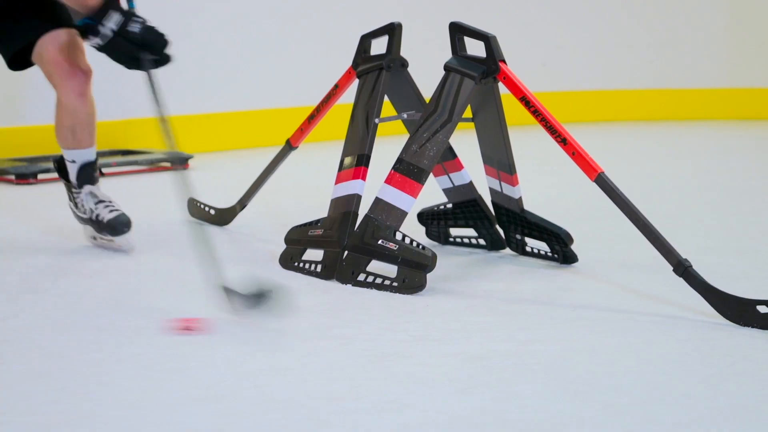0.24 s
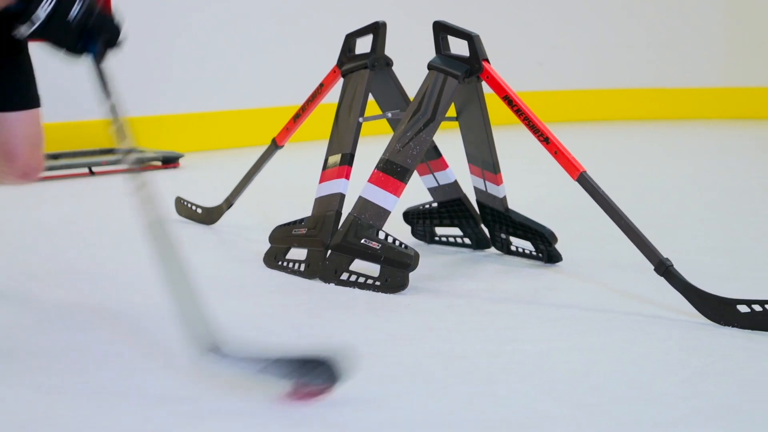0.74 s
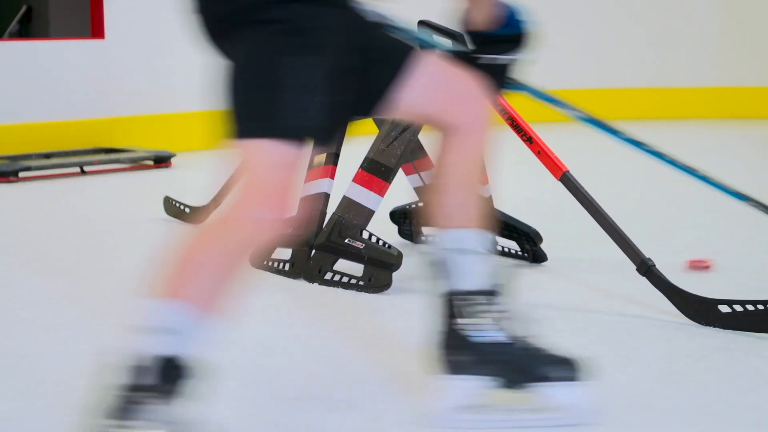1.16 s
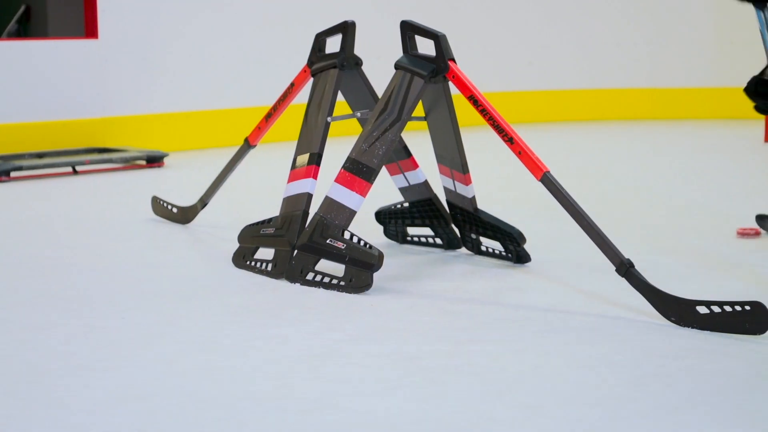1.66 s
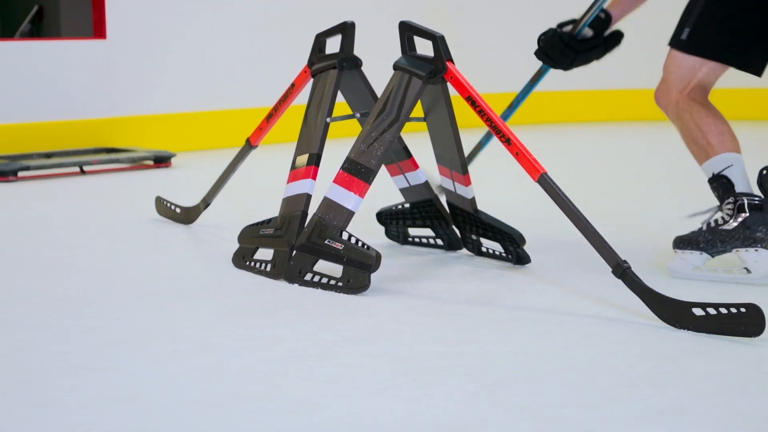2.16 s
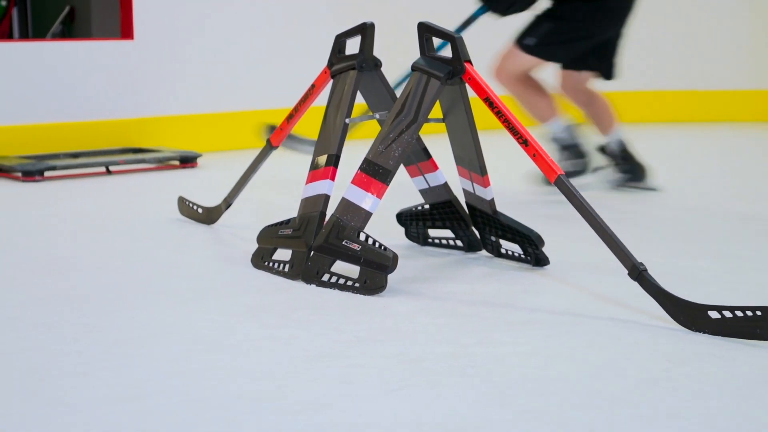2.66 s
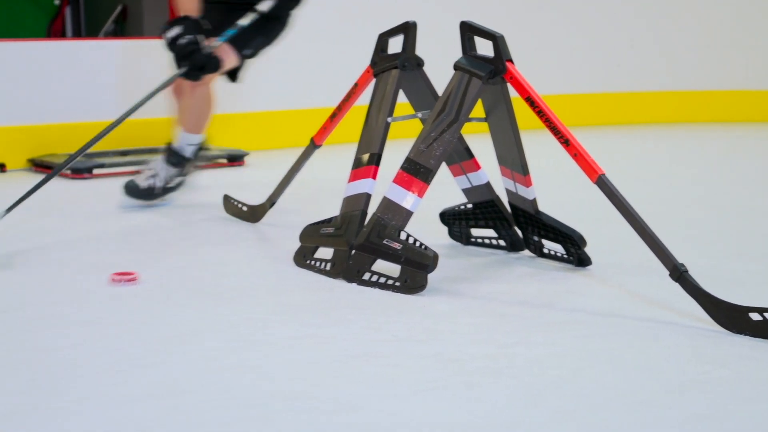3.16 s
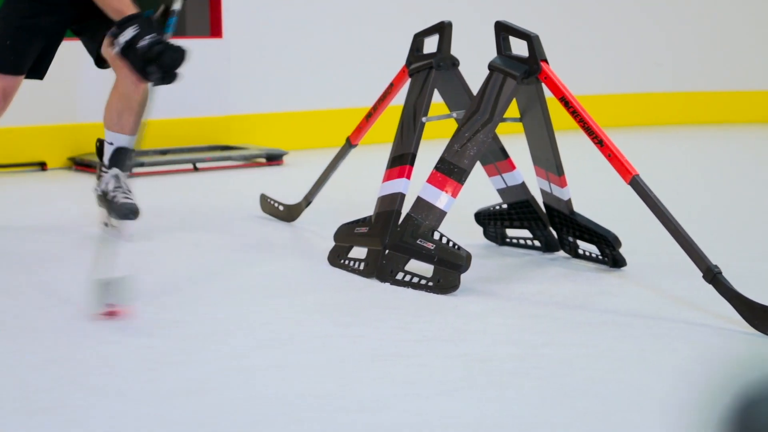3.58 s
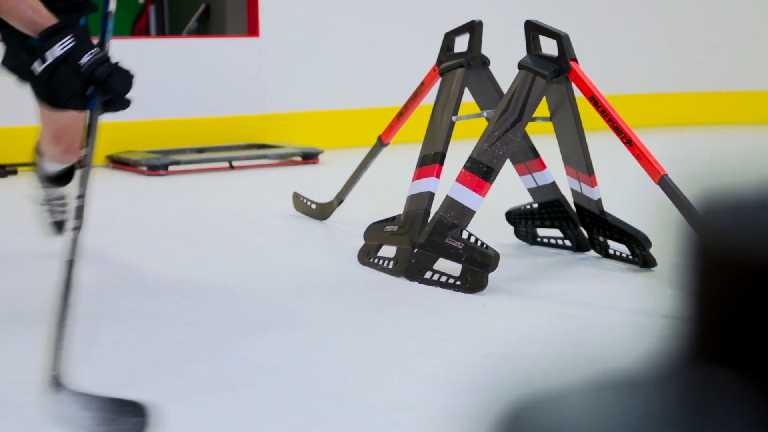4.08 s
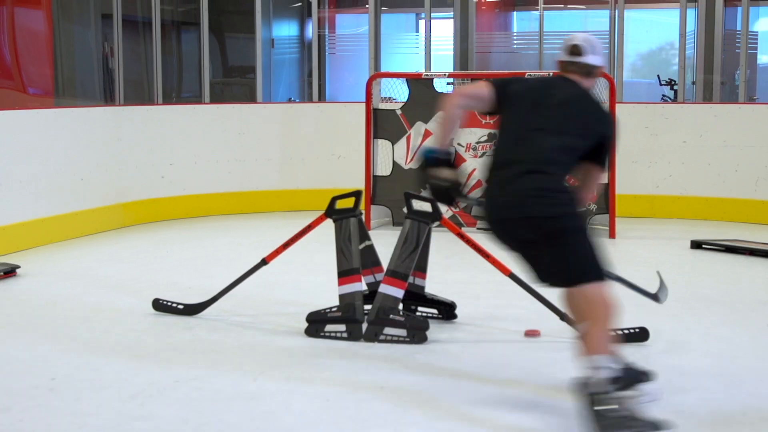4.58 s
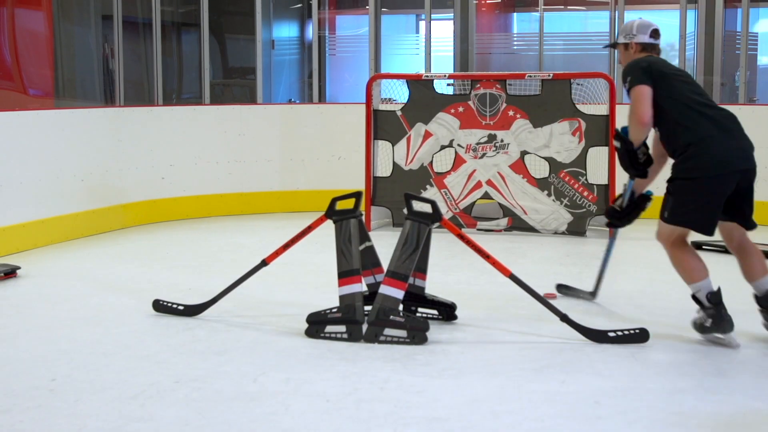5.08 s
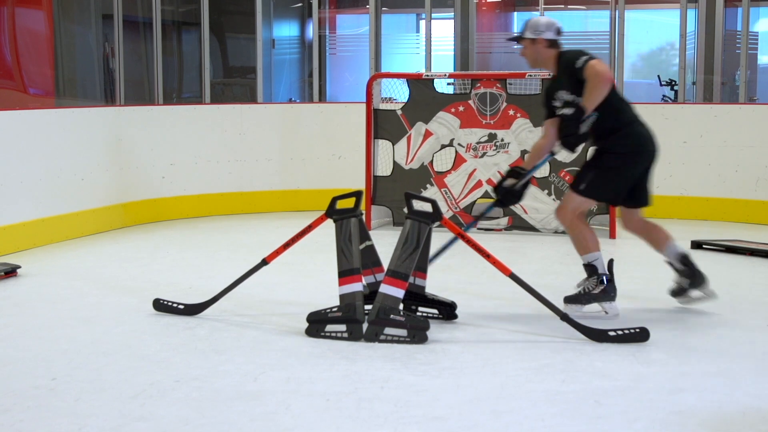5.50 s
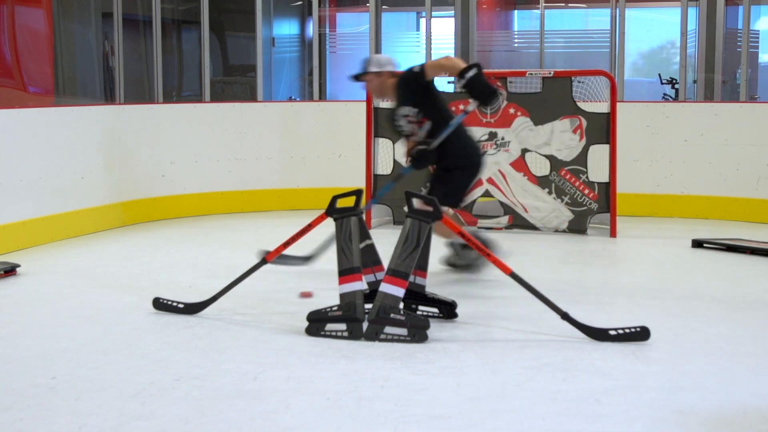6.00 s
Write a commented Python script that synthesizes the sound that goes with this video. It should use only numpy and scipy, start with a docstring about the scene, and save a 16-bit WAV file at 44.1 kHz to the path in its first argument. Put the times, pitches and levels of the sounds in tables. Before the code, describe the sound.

Sharp knocks and woody thuds of stickhandling, quick puck rattles, and skates carving synthetic ice over steady ventilation rush in a lively indoor hall.

```python
"""A small indoor rink with plastic ice tiles, where a hockey player dribbles a puck before one microphone.
Skates drum, rush, grind and scrape on the hollow floor: shaped noises whose levels follow each move.
Stick blows mix tile thud, blade ring, crack and edge chatter; puck and runners add short noise taps.
Boards, glass and ceiling echo the blows and taps; the hall's ventilation rushes steadily behind."""
import sys
import numpy as np
from scipy import signal
from scipy.fft import rfft, irfft, next_fast_len
from scipy.io import wavfile
from scipy.ndimage import uniform_filter1d, map_coordinates

SR = 44100
rng = np.random.default_rng(int(sys.argv[2]) if len(sys.argv) > 2 else 0)


def master(y):
    """Save y as 16-bit WAV."""
    cut = np.clip(np.atleast_2d(y).T, -1, 1)
    pcm = np.round(cut * 32767)  # scale
    wavfile.write(sys.argv[1], SR, pcm.astype(np.int16))


N = 275625

# blows of the stick: (time [s], strength [dB], hardness [0 flat on the tile to 1 square on the puck],
# free ring [dB], bending mode [Hz], twisting mode [Hz])
BLOWS = [(0.0218, -14.5, .39, -7, 1010, 2160), (0.1284, -5.5, 0.75, 1, 973, 2610),
         (0.3657, -10, 0.61, 4, 817, 2550), (0.398, -8.5, 0.8, 1.5, 1140, 1920),
         (0.586, -17, .17, 0.5, 910, 1680), (0.6681, -5.5, 0.536, -5.5, 890, 1890),
         (0.7021, -6.5, 0.75, -2, 1185, 2300), (0.899, -18.5, 0.29, 2.5, 780, 1720),
         (1.0377, -16, 0.19, 3, 780, 1850), (1.385, -11.5, 0.53, -3.5, 786, 3350),
         (1.407, -20.5, .85, 5.5, 926, 1600), (1.785, -20.5, 0.044, 3.5, 690, 3100),
         (1.8595, -11, 0.83, 7, 917, 1620), (2.098, -14.5, 0.84, 10, 1105, 2580),
         (2.141, -11.5, 1, 0, 750, 2740), (2.373, -5.5, 0.63, -7.5, 1360, 3200),
         (2.386, -10.5, 0.4, 6, 1110, 2270), (2.4152, -11.5, 0.91, 5, 1298, 1960),
         (2.829, -12, 0.056, -0.5, 865, 1730), (3.4151, -17, 0.4, -3, 980, 1810),
         (3.6127, -8.5, 0.74, 3, 980, 2480), (3.8074, -8, 0.55, 6, 774, 2460),
         (3.848, -9.5, 0.86, -0.5, 1405, 2490), (4.0401, -17, 0.028, -6, 740, 3330),
         (4.0954, -2, 0.51, -2, 1100, 2050), (4.1491, -11.5, 0.74, 2, 724, 1670),
         (4.514, -12, 0.16, 3.5, 846, 2010), (4.857, -23.5, 0.38, -0.5, 875, 1560),
         (5.021, -24.5, 0.24, 4.5, 715, 3560), (5.2425, -10, 0.57, 4, 950, 2070),
         (5.5015, -10, 0.32, 6, 1094, 2180), (5.5379, -12, 0.99, 3.5, 907, 1660),
         (5.7821, -4.5, .74, -3.5, 820, 1910), (5.8225, -14.5, 0.86, 4, 1320, 1910),
         (6.235, -11, 0.094, 3, 755, 1780)]
# bright chatter of hard edges: (frequency [Hz], relative density [dB])
EDGE_SPECTRUM = [(2500, -19), (4400, 3), (5600, -0.5), (7200, -1.5), (8300, 0), (9600, -5.5), (11000, -5),
                 (12300, -2), (14000, -11), (16000, -13)]
# short tap on a tile: (frequency [Hz], relative density [dB])
TAP_SPECTRUM = [(300, 14), (900, 9), (2300, 6), (3700, 0), (5000, -6), (8000, -48), (16000, -39)]
TICK_DB = -18  # bright tick of a puck landing or stray runner, against the tap's strength


def amp(db):
    """Decibels to gain."""
    return 10 ** (np.asarray(db) / 20)


def unit(x):
    """Scaled to rms 1."""
    return x / np.sqrt(np.mean(x ** 2) + 1e-20)


def unit_onset(x):
    """Scaled to rms 1 over its first hundredth of a second."""
    return x / np.sqrt(np.mean(x[:SR // 100] ** 2) + 1e-20)


def along(points, hz):
    """Values between (Hz, value) points on a log frequency axis."""
    f, v = np.transpose(points)
    return np.interp(np.log(hz + 1), np.log(f + 1), v)


def wobble(rate, size=N):
    """A smooth random curve with rate knots a second."""
    knots = rng.standard_normal(int(size * rate / SR) + 4)
    return map_coordinates(knots, [np.arange(size) * rate / SR])


def filtered(x, response):
    """x times a response of frequency."""
    m = next_fast_len(len(x) + 4096)
    return irfft(rfft(x, m) * response(np.fft.rfftfreq(m, 1 / SR)), m)[:len(x)]


def coloured(x, spectrum):
    """x shaped by the spectrum, falling steeply past both its ends, at rms 1."""
    low, high = spectrum[0][0], spectrum[-1][0]

    def response(hz):
        skirts = np.minimum(hz / low, 1) ** 2 * np.minimum(high / (hz + 1), 1) ** 4
        return amp(along(spectrum, hz)) * skirts

    return unit(filtered(x, response))


def noise(spectrum, size):
    """Noise of rms 1 with the given spectrum."""
    return coloured(rng.standard_normal(size), spectrum)


def slips(rate, size):
    """Tiny random impacts, on average rate a second, at rms 1."""
    return unit(rng.standard_normal(size) * (rng.random(size) < rate / SR))


def held(rows, attack_s, release_s):
    """Gain that rises, holds and falls for each (start s, end s, dB) row."""
    t = np.arange(N) / SR
    gain = np.zeros(N)
    for start, end, db in rows:
        gain += amp(db) * np.interp(t, [start, start + attack_s, end, end + release_s], [0, 1, 1, 0])
    return gain


def contact(t, rise, hold, t60):
    """Envelope of a blow: it builds, lasts while the surfaces chatter, then dies."""
    return (1 - np.exp(-t / rise)) * amp(-60 * np.maximum(t - hold, 0) / t60)


def add(track, s, sound):
    """Mix a sound into the track at time s."""
    i = max(round(s * SR), 0)
    track[i:i + len(sound)] += sound[:max(N - i, 0)]


def hall():
    """Steady rush of the ventilation, as unchanging shaped noise."""
    # rush of the hall: (frequency [Hz], relative density [dB])
    rush = [(25, -45), (70, -30), (160, -9.5), (240, -7), (373, 1.5), (600, -6), (900, -9), (1500, -22.5),
            (2150, -21.5), (2800, -36), (5700, -35.5), (11000, -37.5), (12200, -36), (13200, -39.5),
            (15500, -46)]
    return amp(-39) * noise(rush, N)


def skates():
    """Runners drum on the hollow floor, glide, grind when leaned on and tear fine grains off the plastic."""
    # the skates under way: (time [s], glide level [dB], edge level [dB], hiss level [dB])
    skating = [(0.0, -35, -42, -53), (0.19, -30, -42, -51), (0.66, -34.5, -38, -52.5),
               (1.09, -34, -54, -49.5), (1.81, -36.5, -44, -53), (2.02, -31.5, -38.5, -48.5),
               (2.42, -36, -39, -53), (2.91, -39.5, -46.5, -54.5), (3.38, -35.5, -72, -57.5),
               (3.62, -32.5, -43, -49), (4.12, -33, -37.5, -58), (4.37, -32.5, -43.5, -55),
               (4.67, -37, -51.5, -54), (5.15, -32, -48, -54.5), (5.4, -33, -39.5, -51),
               (5.97, -30.5, -37.5, -51), (6.09, -32.5, -45, -53), (6.25, -37, -51, -48)]
    # strides that load the hollow floor: (start [s], end [s], rumble level [dB])
    strides = [(0.26, 0.62, -41), (1.18, 1.36, -39.5), (1.48, 1.82, -45), (2.12, 2.38, -37),
               (3.29, 3.56, -52), (3.72, 4.04, -49), (5.52, 5.64, -37), (5.66, 5.77, -32)]
    # carves, an edge leaned hard into the turn: (start [s], end [s], grind level [dB], hiss level [dB])
    carves = [(0.0, 0.12, -29, -50), (0.74, 0.843, -35, -48.5), (1.008, 1.28, -39, -59),
              (1.382, 1.55, -28.5, -64), (4.275, 4.337, -32, -46), (5.265, 5.322, -29, -50),
              (5.99, 6.07, -28, -44.5)]
    # spectra of the floor, the glide, the leaned runner, shaved plastic and the scraping edge:
    # (frequency [Hz], relative density [dB])
    rumble_spectrum = [(20, -30), (45, -5), (70, 1), (108, 2.5), (140, -4), (200, -4.5), (350, -51)]
    glide_spectrum = [(100, -46), (220, -16.5), (310, -1.5), (390, 2), (500, -4), (650, -9), (1100, -30)]
    grind_spectrum = [(350, 7), (560, 4.5), (720, 0), (950, -4), (1300, -11.5), (1800, -26), (3000, -20)]
    hiss_spectrum = [(3000, 4.5), (6000, -1), (9000, -0.5), (12300, -1.5), (15500, -7)]
    scrape_spectrum = [(700, -29), (1400, 23.5), (2500, 16.5), (3100, 4.5), (3800, 14.5), (4900, 0.5),
                       (6300, -10), (8300, -29.5), (10300, -38.5), (12300, -2), (15500, -40)]
    load_s, unload_s = 0.02, 0.076  # weight comes on and off
    rolling_db, glide_offset_db, grind_db = -21.5, -2.5, -8  # each against the glide level
    hiss_offset_db, scrape_offset_db = -3.5, -7  # against the hiss and edge levels

    s, *columns = np.transpose(skating)
    glide_db, edge_db, hiss_db = [np.interp(np.arange(N) / SR, s, c) for c in columns]
    # an unloaded runner still rumbles faintly under its glide
    weight = held(strides, load_s, unload_s) + amp(glide_db + rolling_db)
    lean = held([(start, end, db) for start, end, db, _ in carves], load_s, unload_s)
    shave = held([(start, end, db) for start, end, _, db in carves], load_s, unload_s)

    rumble = weight * amp(0.67 * wobble(25)) * noise(rumble_spectrum, N)
    glide_flicker_db = 1.7 * wobble(35) + 0.5 * wobble(9.8)
    glide = amp(glide_db + glide_offset_db + glide_flicker_db) * noise(glide_spectrum, N)
    grind_gain = np.hypot(lean, amp(glide_db + grind_db))
    grind = grind_gain * amp(3.3 * wobble(60)) * noise(grind_spectrum, N)
    hiss_gain = np.hypot(shave, amp(hiss_db + hiss_offset_db))
    hiss = hiss_gain * amp(1.6 * wobble(30)) * noise(hiss_spectrum, N)

    grains = coloured(slips(1500, size=N) + .5 * rng.standard_normal(N), scrape_spectrum)
    # now and then an edge catches on a nick or a seam, more often the harder it bites
    t = np.arange(SR // 100) / SR
    nicks = rng.random(N) < 50 * amp(edge_db - np.median(edge_db)) / SR
    catches = signal.fftconvolve(nicks.astype(float), np.exp(-t / 0.0011))[:N]
    crunch = unit(catches * noise(TAP_SPECTRUM, N))
    scrape_gain = amp(edge_db + scrape_offset_db + 1.5 * wobble(40))
    scrape = scrape_gain * (grains + amp(-5) * crunch)
    return rumble + glide + grind + hiss + scrape


def blade(hz):
    """Response of the composite blade: a sum of resonances with alternating sign."""
    # the blade's upper resonances: (centre [Hz], width [Hz], level [dB])
    resonances = [(1290, 140, 0), (1720, 220, 2), (1874, 42, 4.5), (2170, 300, -1), (2894, 220, 1.5),
                  (3390, 1010, -1), (4070, 1170, -6.5)]
    response = 0
    for k, (centre, width, db) in enumerate(resonances):
        damping = 1j * hz * width
        response = response + (-1) ** k * amp(db) * damping / (centre * centre - hz * hz + damping)
    return response


def rink(x, wet_db, ceiling_db):
    """A sound with its echo: a bright slap off the ceiling, then a diffuse tail."""
    # decay of the rink's echo: (frequency [Hz], time to fall 60 dB [s])
    decay = [(120, 0.58), (400, 0.23), (1000, 0.5), (2800, 0.43), (8000, 0.37), (15000, 0.11)]
    # colour of the rink's echo: (frequency [Hz], relative level [dB])
    echo_colour = [(20, -34), (50, -12), (120, -4.5), (220, -10.5), (380, 2), (900, -4), (2000, -6),
                   (4000, -6.5), (7000, -3), (8300, 0), (10000, -1), (12300, 0.5), (15000, -2)]
    build_s = 0.016  # time the diffuse echo takes to build
    ceiling_s = 0.014  # mean delay of the ceiling slap
    size = 2 ** 15
    t, hz = np.arange(size) / SR, np.fft.rfftfreq(size, 1 / SR)

    # the room hears a blow from all sides, so its narrow peaks blur
    power = uniform_filter1d(np.abs(rfft(x, size)) ** 2, size=160)
    colour = np.sqrt(np.abs(power))
    wash = irfft(rfft(rng.standard_normal(size)) * colour * amp(along(echo_colour, hz)), size)
    # each frequency dies at its own speed
    band_hz, frame_s, z = signal.stft(wash, SR, nperseg=256)
    t60 = along(decay, band_hz)
    tail = signal.istft(z * amp(-60 * frame_s / t60[:, None]), SR, nperseg=256)[1][:size]
    tail = tail / np.sqrt(SR * t60.mean() / (2 * np.log(1000)))
    # early on, single boards and panes still stand out of the tail
    panes = amp(6.2 * wobble(255, size=size) * np.exp(-t / 0.057))
    out = amp(wet_db) * tail * panes * (1 - np.exp(-(t / build_s) ** 2))

    late = int(ceiling_s * rng.uniform(.85, 1.15) * SR)
    out[late:late + len(x)] += amp(ceiling_db) * filtered(x, lambda f: f / (f + 4500))
    out[:len(x)] += x
    return out


def hits():
    """Each blow thuds in the tile and rings the blade; harder contact trades thud for crack and chatter."""
    # thud of the tile: (frequency [Hz], relative density [dB])
    thud_spectrum = [(30, -51), (70, -24), (150, -9.5), (240, -5), (350, -2.5), (520, -1.5), (700, -6.5),
                     (1200, -33)]
    # knock of the blade: (frequency [Hz], relative density [dB])
    knock_spectrum = [(350, -1.5), (600, -5.5), (850, 0), (1200, -2), (1500, -14), (2500, -11)]
    # the echo of the blows is stronger from about 4.8 s on: (time [s], echo level [dB])
    echo = [(4.2, -4.5), (4.8, -2.4)]
    # each part against the blow's strength: (dB when soft, dB gained at full hardness)
    thud_law, ring_law, crack_law, snap_law = (-.5, -14.5), (-13, 8.9), (-22.5, 22.23), (-29, 17.04)
    snap_grows, usual_db = .25, -13.5  # extra dB of edge chatter for each dB above a usual blow
    tile_hz, tile_scatter = 418, 0.047  # mean pitch of a lightly struck tile, share by which tiles differ
    tile_sag = 0.24  # share by which the pitch sinks when the puck's mass loads the tile

    out, t = np.zeros(N), np.arange(SR // 12) / SR
    for s, db, hardness, free_db, ring_hz, crack_hz in BLOWS:
        laws = (thud_law, ring_law, crack_law, snap_law)
        thud_db, ring_db, crack_db, snap_db = [db + soft + gain * hardness for soft, gain in laws]
        ring_db += free_db
        snap_db += snap_grows * (db - usual_db)

        # the tile gives way a moment after the blade sounds
        thud_hz = tile_hz * (1 - tile_sag * hardness ** 2) * np.exp(tile_scatter * rng.standard_normal())
        tile = np.sin(2 * np.pi * thud_hz * t) * contact(t, rise=0.0016, hold=0.0022, t60=0.034)
        floor = noise(thud_spectrum, len(t)) * contact(t, rise=0.0031, hold=0.0047, t60=0.062)
        thud = unit_onset(unit_onset(tile) + 0.9 * unit_onset(floor))

        bend = np.sin(2 * np.pi * ring_hz * t) * contact(t, rise=0.00015, hold=0.00043, t60=0.034)
        rap = noise(knock_spectrum, len(t)) * contact(t, rise=0.00014, hold=0.00057, t60=0.054)
        ring = unit_onset(unit_onset(bend) + 0.93 * unit_onset(rap))

        twist = np.sin(2 * np.pi * crack_hz * t) * contact(t, rise=0.00039, hold=0.00061, t60=0.017)
        scuff = rng.standard_normal(len(t)) * contact(t, rise=0.00013, hold=0.0033, t60=0.023)
        # a lower twisting mode leaves less of the highest resonances
        scuff = filtered(scuff, lambda hz: blade(hz) / (1 + (hz / (2.67 * crack_hz)) ** 4))
        crack = unit_onset(unit_onset(scuff) + 0.82 * unit_onset(twist))

        chatter = coloured(slips(9000, size=len(t)), EDGE_SPECTRUM)
        snap = unit_onset(chatter * contact(t, rise=0.0026, hold=0.0022, t60=0.024))

        knock = amp(thud_db) * thud + amp(ring_db) * ring + amp(crack_db) * crack + amp(snap_db) * snap
        wet_db = np.interp(s, *np.transpose(echo))
        add(out, s, rink(knock, wet_db, ceiling_db=-14))
    return out


def drags():
    """The blade, dragged flat over the tiles, rasps through its resonances as a stream of tiny slips."""
    # strokes of the dragged blade: (start [s], end [s], level [dB])
    strokes = [(0.085, 0.125, -29), (1.773, 1.85, -38), (3.44, 3.6, -40.5), (4.18, 4.25, -38.5),
               (5.185, 5.24, -40)]
    # rasp of the dragged blade: (frequency [Hz], relative density [dB])
    rasp_spectrum = [(1200, 0), (2000, -10), (2420, 2), (2750, -3), (3100, -9), (3500, -6), (4100, -14),
                     (4700, -14), (5500, -9), (6400, -13), (7400, -21), (15000, -32)]
    pressure = held(strokes, attack_s=0.033, release_s=.025)
    return pressure * amp(1.2 * wobble(90)) * coloured(slips(2800, size=N), rasp_spectrum)


def bounces(count):
    """A struck puck lands ever more softly after shrinking flights: rows (s, strength dB, tick dB)."""
    puck_hardness = .55  # harder blows have caught the puck and set it bouncing
    first_s, shrink = 0.034, .75  # typical first flight, and each next one over it
    first_db, loss_db = -5.5, 4  # first landing against the blow, and the loss at each next one
    rows, k = [], np.arange(count)
    for s, db, hardness, *_ in BLOWS:
        flights = first_s * shrink ** k * np.exp(.2 * rng.standard_normal(count))
        if hardness > puck_hardness:
            for delay, loss in zip(np.cumsum(flights), loss_db * k):
                rows.append((s + delay, db + first_db - loss, TICK_DB))
    return rows


def strays():
    """The runners tick faintly at twelve chance moments: rows (s, strength dB, tick dB)."""
    rows = []
    for _ in range(12):
        strength_db = -32 + 2.5 * rng.standard_normal()
        rows.append((rng.uniform(0, N / SR), strength_db, TICK_DB))
    return rows


def taps():
    """The puck wobbles and the steel runners tick on the tiles: brief noise bodies with bright ticks."""
    # single taps of puck and steel: (time [s], strength [dB], tick against the strength [dB])
    single_taps = [(0.324, -18, -23), (1.031, -18, -15), (1.123, -19.5, -20), (1.336, -20.5, -13),
                   (1.4362, -13.5, -28), (2.016, -12, -20), (2.184, -19.5, -7), (2.3253, -23, -33),
                   (2.4279, -8.5, -17), (3.314, -30.5, -16), (4.1063, -13, -4), (4.2503, -17, -19),
                   (5.1467, -19, -30), (5.3388, -18, -28), (5.425, -33.5, -9), (5.4758, -14.5, -25),
                   (5.6368, -25, -7), (5.9387, -11.5, -24), (5.974, -13, -30), (6.0608, -15.5, -19)]
    out, t = np.zeros(N), np.arange(SR // 20) / SR
    for s, db, tick_db in single_taps + bounces(count=3) + strays():
        body = unit_onset(noise(TAP_SPECTRUM, len(t)) * contact(t, rise=0.00037, hold=0.0015, t60=0.0074))
        tick = unit_onset(noise(EDGE_SPECTRUM, len(t)) * contact(t, rise=0.00064, hold=0.0022, t60=0.0074))
        tap = amp(db - 15.5) * body + amp(db + tick_db - 9.5) * tick
        add(out, s, rink(tap, wet_db=-1, ceiling_db=-16.5))
    return out


def scene():
    """All sources at one microphone."""
    return (hall() + skates() + hits() + drags() + taps())[None]


def record(dry):
    """The hardest blows flatten against full scale; the deepest bass and all above the band limit are cut."""
    knee, top_hz, bass_hz = 8, 16000, 22  # a higher knee exponent bends later and more sharply
    squashed = dry[0] / (1 + np.abs(dry[0]) ** knee) ** (1 / knee)
    return filtered(squashed, lambda hz: (hz < top_hz) * hz ** 2 / (hz ** 2 + bass_hz ** 2))[None]


dry = scene()
out = record(dry)
master(out)
```